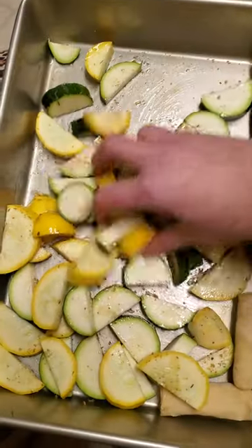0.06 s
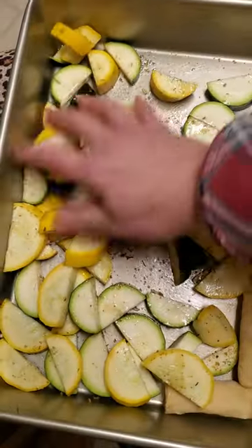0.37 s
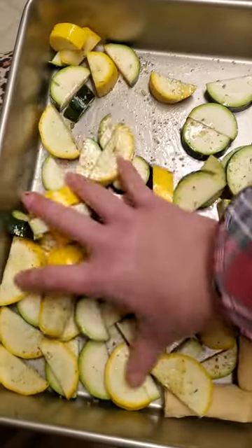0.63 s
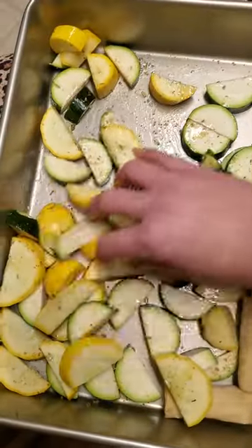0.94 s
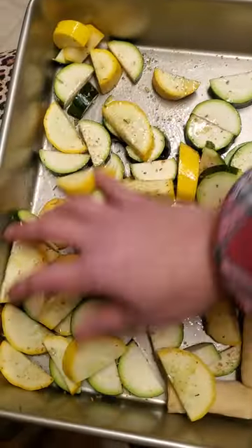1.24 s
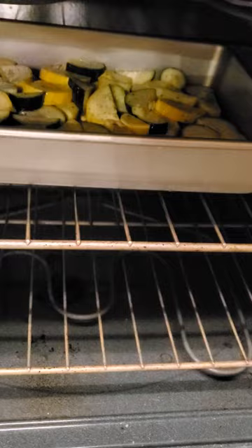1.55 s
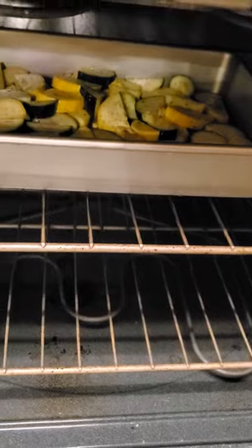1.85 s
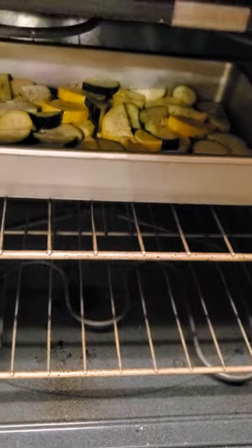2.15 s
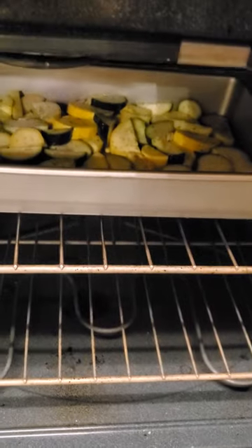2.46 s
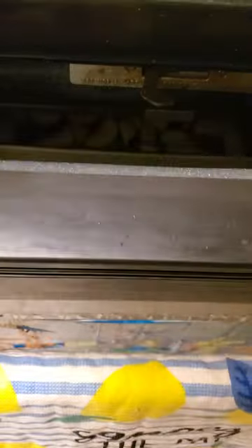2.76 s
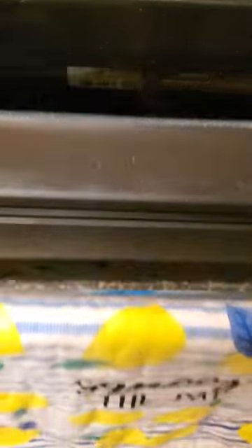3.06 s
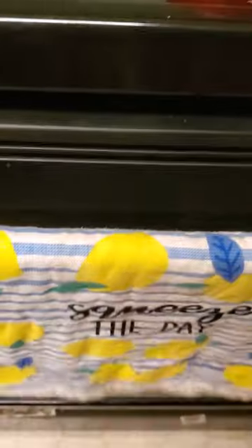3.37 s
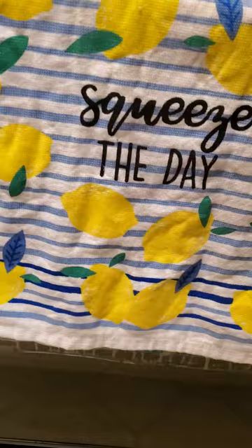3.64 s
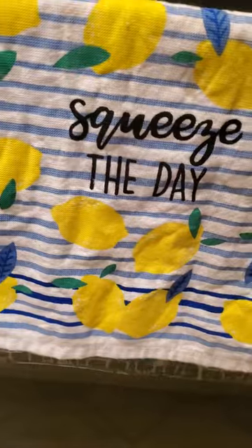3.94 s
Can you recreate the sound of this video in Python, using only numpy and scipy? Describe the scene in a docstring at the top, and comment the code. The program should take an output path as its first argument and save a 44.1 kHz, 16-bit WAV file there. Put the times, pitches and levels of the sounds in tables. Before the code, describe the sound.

In a small kitchen with a faint motor hum, a hand slides moist vegetable slices around a metal pan. After light rack clinks, a nearby oven door closes with a loud snap, thud and metallic rattle.

```python
"""Courgettes in a pan, oven door

A hand slides wet courgette slices round a metal pan: they crackle, slap and bump its floor. The scene changes
at 1.9 s. A rack clinks, cloth rustles and the oven door swings up: hinges knock, a catch snaps, its spring
squeaks, the door thuds home and sheet metal and racks rattle. A motor hums in the small kitchen throughout."""
import sys
import numpy as np
from scipy import signal
from scipy.fft import rfft, irfft
from scipy.io import wavfile
from scipy.ndimage import uniform_filter1d

SR = 44100
rng = np.random.default_rng(int(sys.argv[2]) if len(sys.argv) > 2 else 0)


def bounce(signal):
    """Save signal as a 16-bit WAV file at the path given by the first command-line argument."""
    frames = np.transpose(np.atleast_2d(signal))
    limited = np.clip(frames, -1, 1)
    pcm = np.round(limited * 32767).astype(np.int16)
    wavfile.write(sys.argv[1], SR, pcm)


N = 176400
T = np.arange(N) / SR
STIR_END_S = 1.896


def undb(db):
    """Decibels to gain."""
    return 10 ** (np.asarray(db) / 20)


def unit(x):
    """Scale to rms 1."""
    return x / np.sqrt(np.mean(x ** 2))


def read(table, hz):
    """Interpolate (Hz, value) points on a log-frequency axis."""
    points_hz, values = np.array(table, float).T
    return np.interp(np.log(hz + 1e-3), np.log(points_hz), values)


def bins(n):
    """FFT frequencies in Hz for n samples."""
    return np.arange(n // 2 + 1) * SR / n


def bands(x, centres_hz):
    """Split x into overlapping bands that sum to x."""
    spectrum, hz = rfft(x), bins(x.shape[-1])
    return [irfft(spectrum * read(list(zip(centres_hz, row)), hz)) for row in np.eye(len(centres_hz))]


def colour(x, table, tilt_db_per_oct=0):
    """Minimum-phase filter through (Hz, dB) points, tilted above 500 Hz."""
    n = x.shape[-1]
    db = read(table, bins(n)) + tilt_db_per_oct * np.log2(np.maximum(bins(n), 500) / 500)
    cepstrum = irfft(np.log(undb(db)), n)
    cepstrum[1:n // 2] *= 2
    cepstrum[n // 2 + 1:] = 0
    return irfft(rfft(x) * np.exp(rfft(cepstrum)), n)


def spread(mid, side):
    """Left and right: alike in the bass, unrelated in the treble."""
    # Each row: frequency in Hz, side over mid in dB.
    width = [(40, -15), (125, -16), (250, -10.5), (500, -6), (1000, 1), (2000, -0.5), (16000, 1)]
    side_gain = undb(read(width, bins(len(mid))))
    m, s = rfft(mid), side_gain * rfft(side)
    return irfft(np.array([m + s, m - s]) / np.sqrt(1 + side_gain ** 2), len(mid))


def noise(n=N):
    """Stereo noise."""
    return spread(*rng.standard_normal((2, n)))


def balance(left_over_right_db):
    """Left and right gains."""
    return undb(np.array([[left_over_right_db], [-left_over_right_db]]) / 2)


def fade(t, t60_s):
    """Exponential decay."""
    return np.exp(-np.log(1000) * t / t60_s)


def swell(peak_s, half_width_s):
    """Gaussian envelope."""
    return np.exp(-((T - peak_s) / half_width_s) ** 2)


def walk(rate_hz):
    """Smooth random curve, rms 1."""
    hold = int(SR / rate_hz)
    steps = np.repeat(rng.standard_normal(N // hold + 1), hold)
    return unit(uniform_filter1d(uniform_filter1d(steps, hold), hold)[:N])


def add(out, start_s, x):
    """Mix x into out."""
    i = int(start_s * SR)
    out[:, i:i + x.shape[-1]] += x[..., :N - i]


def contacts(hits, spectrum):
    """Dense, fast-dying resonances: one shaped noise burst per hit."""
    out, t = np.zeros((2, N)), T[:SR // 2]
    for start_s, db, t60_s, tilt_db_per_oct in hits:
        envelope = fade(t, t60_s)
        burst = unit(colour(noise(len(t)) * envelope, spectrum, tilt_db_per_oct))
        add(out, start_s, undb(db) * burst * np.sqrt(np.mean(envelope ** 2)))
    return out


def pan_ring(x, ring_db=-0.5):
    """The loaded pan's damped modes answer whatever touches it."""
    # Each row: frequency in Hz, bandwidth in Hz, gain in dB.
    modes = [(520, 76, 15.5), (762, 86, 9), (1080, 40, -13), (1650, 70, -7), (2010, 42, -5),
             (2440, 210, -6), (2940, 120, -4.5), (3370, 55, -4.5), (5500, 160, -6)]
    f = bins(N) + 1e-3
    body = sum(undb(db + ring_db) / (1 + 1j * (f * f - hz * hz) / (f * width_hz))
               for hz, width_hz, db in modes)
    return irfft(rfft(x) * (1 + body), N)


def stick_slip(x, depth_db=4, rate_hz=22):
    """Slices catch and let go: each half octave of treble swells and fades by itself."""
    return sum(band * undb(depth_db * walk(rate_hz)) for band in bands(x, np.geomspace(1000, 16000, 9)))


def sliding_slices(grains_per_s=2500, ticks_per_s=49, tick_t60_s=0.014, rub_db=2, drag_db=3):
    """Wet slices crackle, hiss and tick as the hand pushes them; the pan floor drones under them."""
    # Each row: time in seconds, stirring effort in dB.
    stir = [(0, -52), (.1, -49.5), (.26, -45.5), (.45, -47), (.505, -50), (.56, -47.5), (.65, -52),
            (.78, -58.5), (.88, -58), (1, -50), (1.14, -49), (1.2, -58), (1.26, -57), (1.34, -85),
            (1.41, -63.5), (1.445, -55), (1.5, -59), (1.55, -60), (1.6, -52), (1.8, -48.5), (1.88, -56)]
    # Wet rubbing. Each row: frequency in Hz, gain in dB.
    rub_spectrum = [(530, -31.5), (900, -4.5), (1080, -15), (1170, -1.5), (1510, -5), (3470, 0),
                    (6480, -4.5), (10100, -14), (11700, -7), (15200, -9.5), (16000, -18)]
    # Pan floor. Each row: frequency in Hz, gain in dB.
    drag_spectrum = [(50, -15.5), (150, 6), (260, 5), (450, 1), (900, -9), (2000, -34.5)]
    effort = undb(np.interp(T, *np.array(stir).T) + walk(35.3))
    grains = rng.random(N) < grains_per_s / SR
    grains = grains * undb(2.5 * np.minimum(rng.exponential(size=N), 5))
    tick_pulses = (rng.random(N) < ticks_per_s / SR) * rng.random(N)
    tick_envelope = signal.lfilter([1], [1, -fade(1 / SR, tick_t60_s)], tick_pulses)
    crackle = unit(spread(*(grains * rng.standard_normal((2, N)))))
    hiss = undb(5.5) * noise()
    ticks = undb(-2.5) * unit(tick_envelope * noise())
    wet = colour(crackle + hiss + ticks, rub_spectrum)
    rub = undb(rub_db) * balance(-2.5) * unit(stick_slip(pan_ring(wet)))
    drag = undb(drag_db) * unit(colour(noise(), drag_spectrum))
    return effort * (rub + drag)


def motor_and_air(waver_db=2.53, drift_hz=0.9, air_db=-49.5, drop_s=3.2):
    """A motor's wavering hum in moving air; both drop at 3.2 s, as the door swings up."""
    # Each row: frequency in Hz, level by the pan in dB, level by the oven in dB.
    partials = [(60, -58.5, -63), (113.2, -56, -58.5), (153.3, -57.5, -71), (193.3, -56, -57.5),
                (230.2, -55.5, -58), (271.3, -54, -71), (335, -63.5, -53), (449.6, -63.5, -63),
                (548.5, -63.5, -64)]
    # Each row: frequency in Hz, gain in dB.
    air_spectrum = [(20, -21), (50, -5), (105, -2.5), (150, -11.5), (240, -2), (320, -7), (450, -12),
                    (650, -11.5), (1000, -18), (1800, -25), (2600, -35.5), (4000, -39), (6300, -36),
                    (7500, -44), (10000, -45), (12000, -50), (16000, -47.5)]
    hum, dropped = 0, T > drop_s
    for hz, pan_db, oven_db in partials:
        db = np.where(T < STIR_END_S, pan_db, oven_db) + waver_db * walk(6.92) - 10.5 * dropped
        phase = 2 * np.pi * np.cumsum(hz + drift_hz * walk(8.11)) / SR
        hum += np.sqrt(2) * undb(db) * np.sin(phase)
    air = undb(air_db - 1.5 * dropped) * unit(colour(noise(), air_spectrum))
    return balance(-1) * (hum + air)


def slaps():
    """Wet slices slap each other and ring the pan."""
    # Each row: start in seconds, level in dB, t60 in seconds, tilt in dB per octave.
    hits = [(.1176, -38, .014, 6), (.1516, -47, 0.019, 5), (.243, -39.5, .04, 7), (.258, -46, 0.0097, 18),
            (.3185, -45, 0.0085, 7), (.3885, -42, 0.016, -4), (.4249, -48, 0.013, 7), (.487, -48, .01, 2),
            (.5152, -35, 0.054, -.5), (.5467, -34, 0.07, 2.5), (.612, -45.5, 0.27, 2),
            (1.076, -37.5, 0.037, 3), (1.145, -41, .015, -0.5), (1.4285, -40, 0.08, 2.5),
            (1.5838, -45.5, 0.024, 2), (1.6881, -42.5, 0.14, 5.5), (1.7928, -39.5, 0.063, 6)]
    # Each row: frequency in Hz, gain in dB.
    spectrum = [(150, -6), (500, 0), (1000, 4.5), (2500, 5.5), (6000, -4), (10000, -21), (12000, -6.5),
                (16000, -35)]
    return pan_ring(contacts(hits, spectrum))


def bumps(rise_s=0.00085, t60_s=0.014):
    """Soft slices land on the pan floor: a cycle or two of dull tone."""
    # Each row: start in seconds, level in dB, pitch in Hz.
    landings = [(0.352, -29, 374), (0.3697, -17.5, 286), (0.3864, -17.5, 315), (0.4013, -20.5, 350),
                (.412, -17.5, 277), (0.4176, -17.5, 231), (0.4444, -18.5, 249), (0.4525, -24, 265),
                (1.063, -26.5, 226), (1.079, -22.5, 205), (1.0844, -19, 455), (1.087, -39, 490),
                (1.711, -28.5, 287)]
    out, t = np.zeros((2, N)), T[:SR // 8]
    envelope = (1 - np.exp(-(t / rise_s) ** 2)) * fade(t, t60_s)
    for start_s, db, hz in landings:
        push = envelope * np.sin(2 * np.pi * hz * t)
        add(out, start_s, undb(db) * push / np.abs(push).max())
    return balance(-1) * out


def rack_clinks():
    """Light metal contacts on the oven rack."""
    # Each row: start in seconds, level in dB, t60 in seconds, tilt in dB per octave.
    hits = [(2.155, -59, 0.17, -6.5), (2.6259, -52, 0.11, 0.5), (3.925, -43, .012, -10)]
    # Each row: frequency in Hz, gain in dB.
    spectrum = [(300, -12.5), (1000, 0), (2500, -6), (3450, 3), (4300, -4), (5600, 2), (7000, -6),
                (10000, -20), (12000, -13), (16000, -22)]
    return contacts(hits, spectrum)


def cloth():
    """Sleeve and towel rub in soft swells of noise."""
    # Each row: peak time in seconds, level in dB, half-width in seconds.
    rustles = [(2.58, -69, 0.12), (3.888, -63, 0.11)]
    # Each row: frequency in Hz, gain in dB.
    spectrum = [(600, -10), (2000, 1), (7000, 1.5), (10000, -5), (12000, -3), (16000, -5.5)]
    envelope = sum(undb(db) * swell(peak_s, half_width_s) for peak_s, db, half_width_s in rustles)
    return envelope * unit(colour(noise(), spectrum))


def door_knocks(ring_db=-26, detune_spread=0.0035):
    """The door's metal knocks and rattles; each hit rings the panel and racks."""
    # Each row: start in seconds, level in dB, t60 in seconds, tilt in dB per octave.
    hits = [(3.298, -45, 0.4, -5.5), (3.319, -46, 0.22, 0.5), (3.333, -55, 0.035, 4.5),
            (3.3405, -26.5, 0.11, -1), (3.3604, -28, 0.071, 0), (3.3898, -36.5, 0.073, -3.5),
            (3.4383, -18, 0.12, -0.5), (3.452, -11.5, 0.039, -2), (3.4565, -10.5, 0.062, 1.5),
            (3.4647, -12.5, 0.085, -1.5), (3.474, -17.5, 0.11, -1.5), (3.514, -26.5, .1, -3.5),
            (3.5465, -21.5, 0.076, 1), (3.5663, -26, 0.076, -0.5), (3.578, -54, 0.07, 2),
            (3.6369, -44, .04, -11)]
    # Each row: frequency in Hz, gain in dB.
    spectrum = [(50, -5.5), (110, 4.5), (190, 5.5), (330, -4), (560, 0.5), (760, -5.5), (1000, -1.5),
                (1250, -3.5), (1600, -1.5), (1850, -4.5), (2300, -1), (3000, -3), (3700, 1), (5000, -3),
                (6800, -6.5), (8500, -13.5), (10200, -18.5), (12000, -14), (16000, -23)]
    # Panel and racks. Each row: frequency in Hz, gain in dB, t60 in seconds.
    modes = [(287.2, -1, .6), (387, -2.5, 0.23), (504, -1.5, 0.28), (565, 0, .2), (612, -1, 0.17),
             (1020, 0, .25), (1464, 3, .21), (2997, 1.5, 0.21), (3351, -1, 0.13), (3536, -1, 0.3),
             (3706, -1, .25), (4070, -4, 0.19), (4500, 1.5, 0.25)]
    out, t = contacts(hits, spectrum), T[:SR // 2]
    for start_s, hit_db, _, _ in hits:
        for hz, mode_db, t60_s in modes:
            detuned_hz = hz * (1 + detune_spread * rng.standard_normal())
            stereo_phase = rng.standard_normal((2, 1)) * min(hz / 1500, 2)
            ring = fade(t, t60_s) * np.sin(2 * np.pi * detuned_hz * t + stereo_phase)
            add(out, start_s, undb(hit_db + mode_db + ring_db) * ring)
    return out


def door_thud(rise_s=0.0017, boom_db=-17.5, boom_t60_s=0.98):
    """The door's weight lands on hinge and seal and shakes the cabinet; the bass lingers."""
    # Each row: start in seconds, level in dB, tilt in dB per octave above the lowest mode.
    landings = [(3.3429, -40, 5), (3.438, -14, 1), (3.4497, -19, -4)]
    # Door and cabinet. Each row: frequency in Hz, gain in dB, t60 in seconds.
    modes = [(40, -9, .3), (54, -9, 0.082), (68.5, 2, 0.19), (88, -18, 1.), (113.6, -15.5, 0.61),
             (170.8, -7, .3), (186.5, -3.5, .22), (239.2, -15.5, 0.32)]
    # Kitchen bass. Each row: frequency in Hz, gain in dB.
    boom_spectrum = [(20, -21), (40, 6.5), (80, -2.5), (130, -14), (250, -7), (450, -27.5), (1000, -56)]
    out, t = np.zeros((2, N)), T[:SR]
    attack = 1 - np.exp(-t / rise_s)
    for start_s, db, tilt_db_per_oct in landings:
        body = 0
        for hz, mode_db, t60_s in modes:
            gain = undb(mode_db + tilt_db_per_oct * np.log2(hz / modes[0][0]))
            body += gain * fade(t, t60_s) * np.sin(2 * np.pi * hz * t)
        boom = undb(boom_db) * unit(colour(noise(SR), boom_spectrum)) * fade(t, boom_t60_s)
        add(out, start_s, undb(db) * attack * (body + boom))
    return balance(-0.8) * out


def catch_snap():
    """The catch snaps in a quick cluster of bright clicks."""
    # Each row: start in seconds, level in dB, t60 in seconds, tilt in dB per octave.
    hits = [(3.4107, -11, 0.025, 0.5), (3.4125, -21.5, 0.27, -3), (3.4172, -18.5, 0.022, 4)]
    # Each row: frequency in Hz, gain in dB.
    spectrum = [(200, -20), (1500, -13), (2700, -14), (3500, 1), (5500, -0.5), (8000, 0), (10200, -5),
                (12000, 6), (14000, -0.5), (16000, -12.5)]
    return balance(-6) * contacts(hits, spectrum)


def spring_squeaks(pitch_jitter=0.06):
    """The catch's spring sings briefly as it slides."""
    # Each row: peak time in seconds, level in dB, pitch in Hz, half-width in seconds.
    squeaks = [(3.443, -16, 4526, .005), (3.456, -16.5, 6000, 0.0013)]
    out = np.zeros(N)
    for peak_s, db, hz, half_width_s in squeaks:
        phase = 2 * np.pi * np.cumsum(hz * (1 + pitch_jitter * walk(2000))) / SR
        out += undb(db) * swell(peak_s, half_width_s) * np.sin(phase)
    return out


def kitchen(x, wet_db, build_s=0.0065):
    """Add the room's tail, longest in the bass."""
    # Each row: frequency in Hz, t60 in seconds.
    room_t60 = [(100, 0.81), (500, .42), (3000, 0.37), (8000, 0.24), (16000, .27)]
    t, centres_hz = T[:SR], np.geomspace(60, 16000, 9)
    noise_bands = bands(noise(SR), centres_hz)
    tail = sum(band * fade(t, read(room_t60, hz)) for hz, band in zip(centres_hz, noise_bands))
    build = 1 - np.exp(-(t / build_s) ** 2)
    response = unit(tail * build) / np.sqrt(SR)
    return x + undb(wet_db) * signal.fftconvolve(x, response, axes=1)[:, :N]


def scene():
    """The pan, cut off with its room tail, then the oven door; hum under both."""
    stirring = kitchen(sliding_slices() + slaps(), wet_db=-6.5) + kitchen(bumps(), wet_db=-12)
    metal = balance(-1.5) * (rack_clinks() + door_knocks() + spring_squeaks())
    oven = kitchen(metal + catch_snap(), wet_db=-8) + door_thud()
    return stirring * (T < STIR_END_S) + oven + motor_and_air() + cloth()


def record(dry, low_cut_hz=18, clip_level=0.93, high_cut_hz=16100):
    """High-pass, hard clip, steep low-pass."""
    highpass = signal.butter(2, low_cut_hz, "high", fs=SR, output="sos")
    lowpass = signal.ellip(10, 0.1, 80, high_cut_hz, fs=SR, output="sos")
    clipped = np.clip(signal.sosfilt(highpass, dry), -clip_level, clip_level)
    return signal.sosfilt(lowpass, clipped)


dry = scene()
out = record(dry)
bounce(out)
```